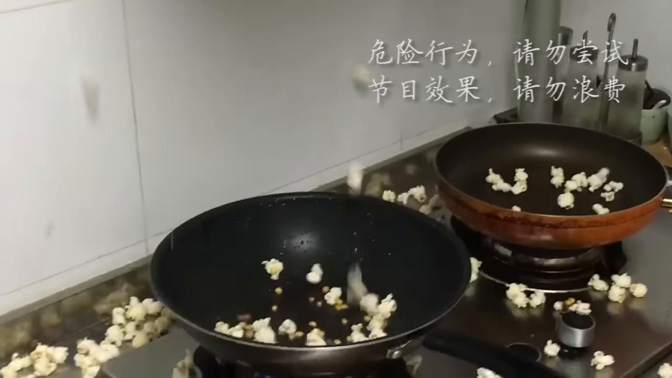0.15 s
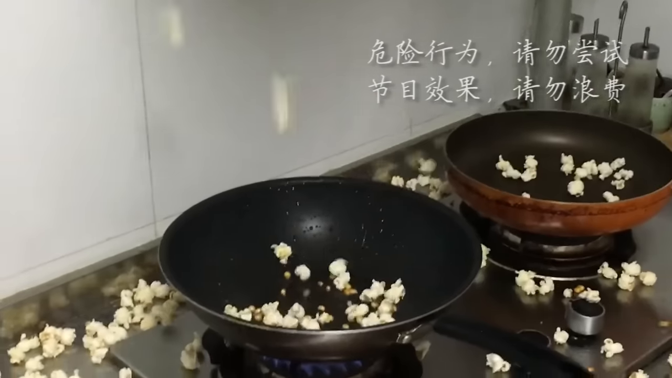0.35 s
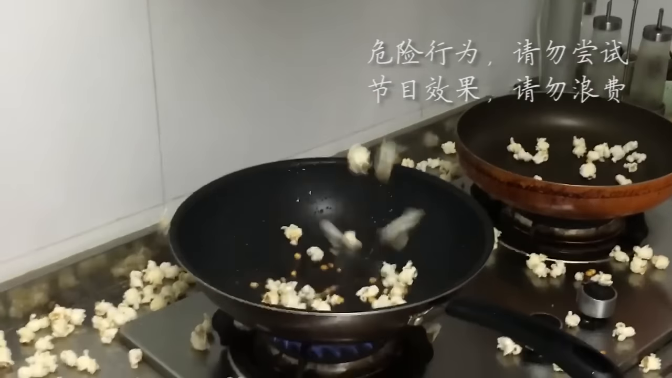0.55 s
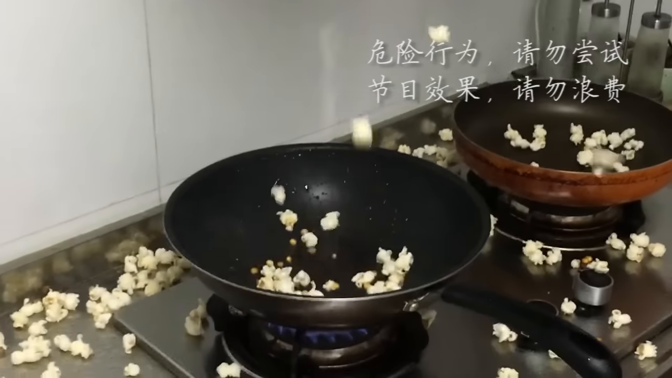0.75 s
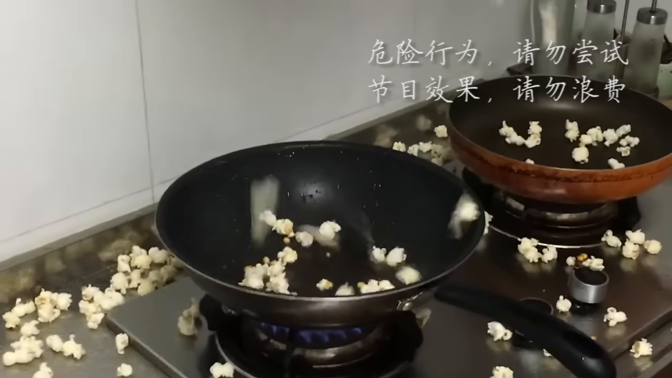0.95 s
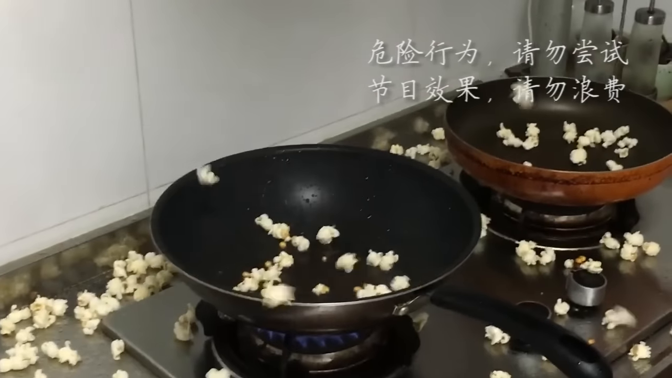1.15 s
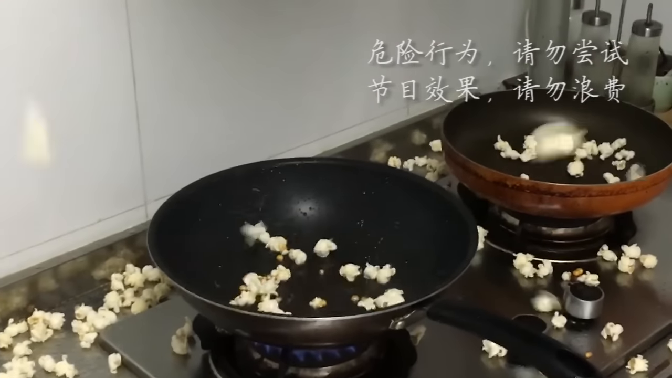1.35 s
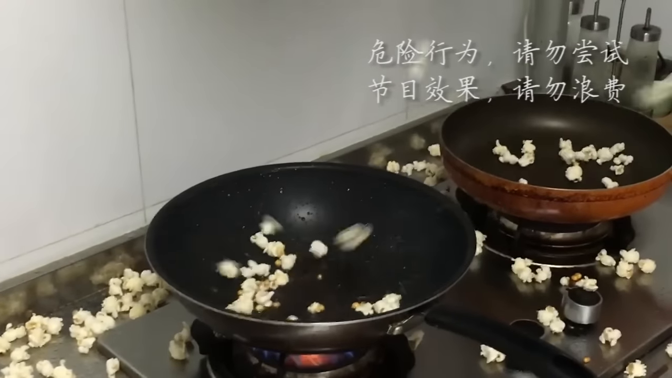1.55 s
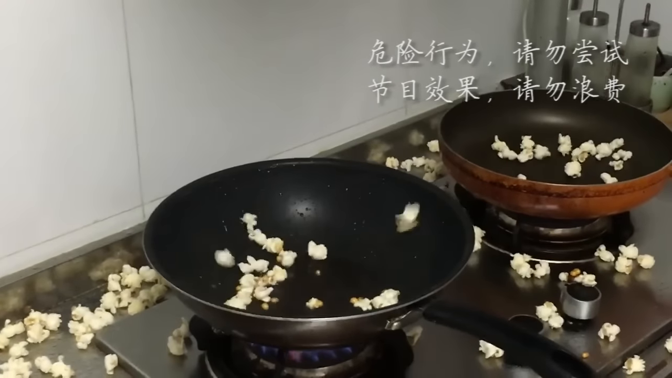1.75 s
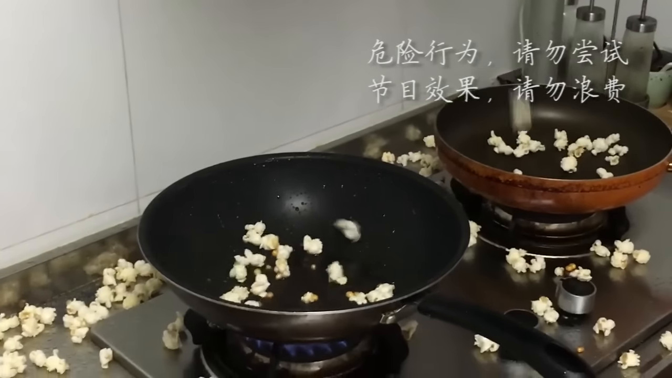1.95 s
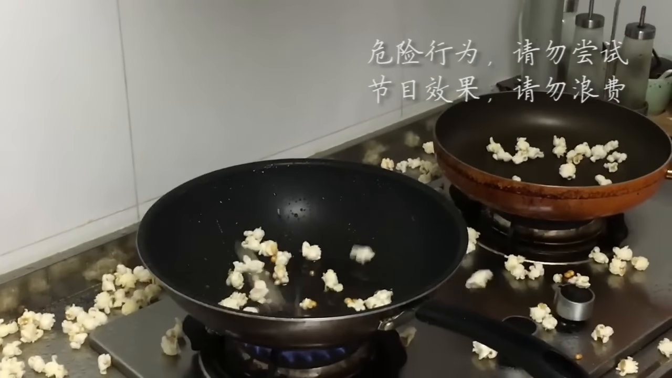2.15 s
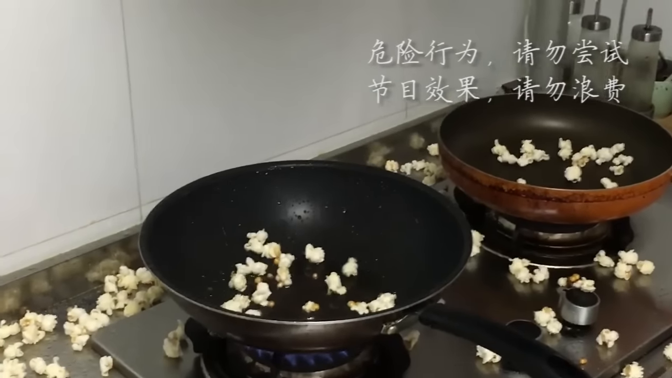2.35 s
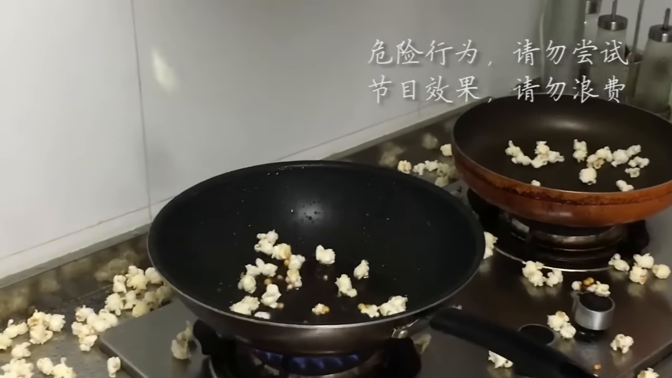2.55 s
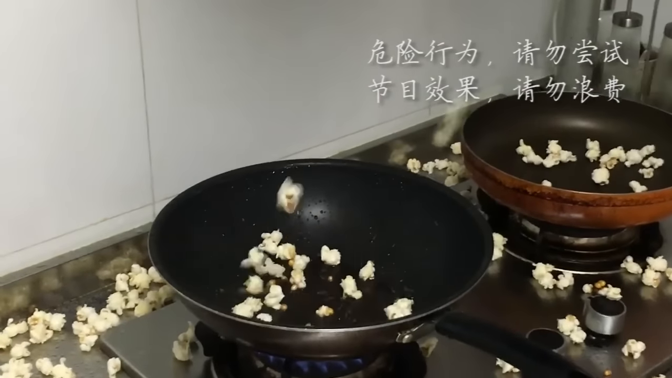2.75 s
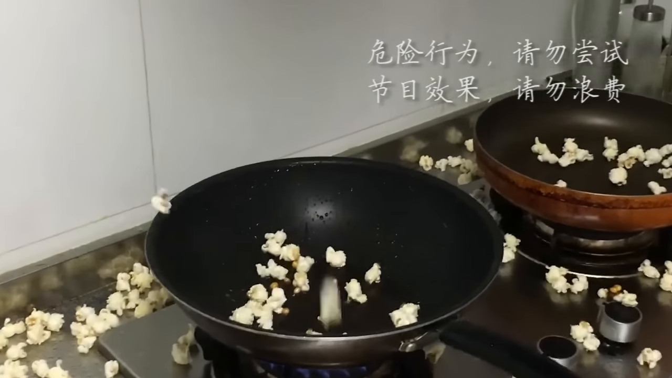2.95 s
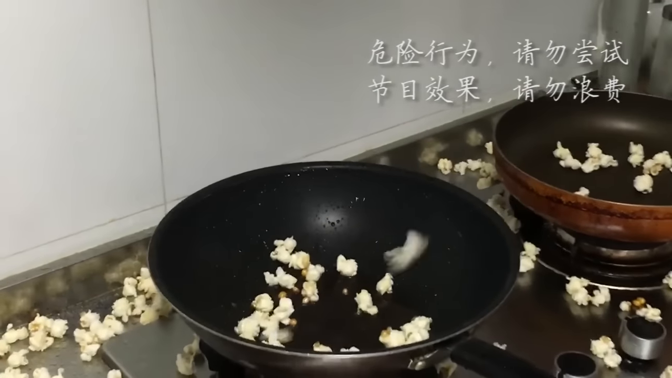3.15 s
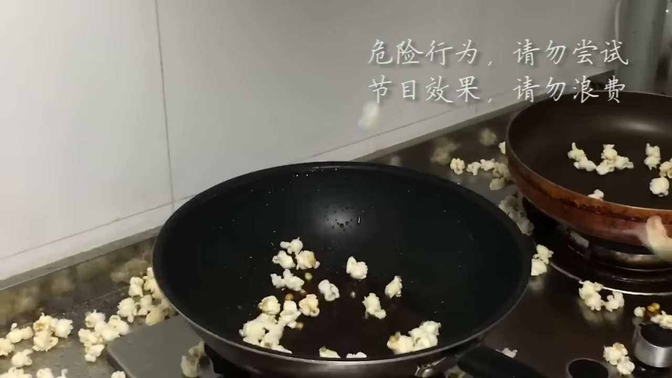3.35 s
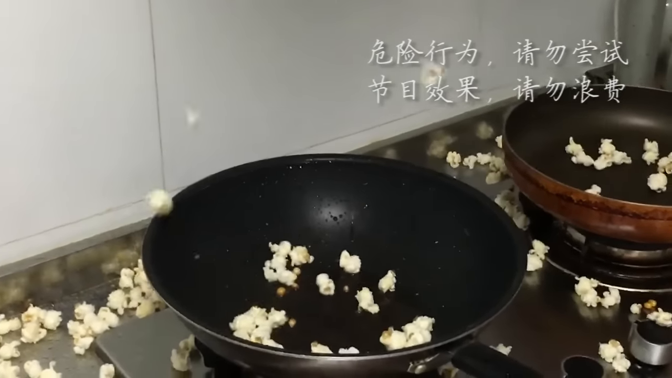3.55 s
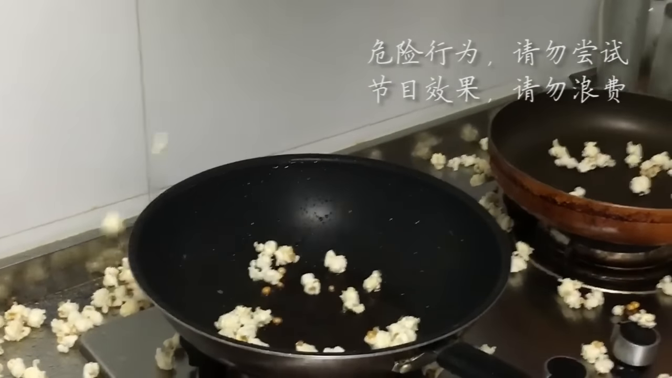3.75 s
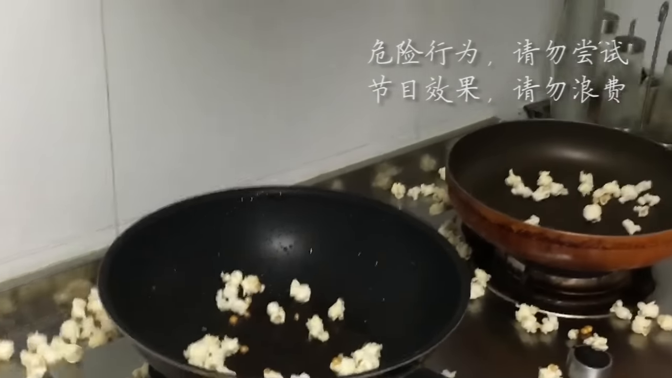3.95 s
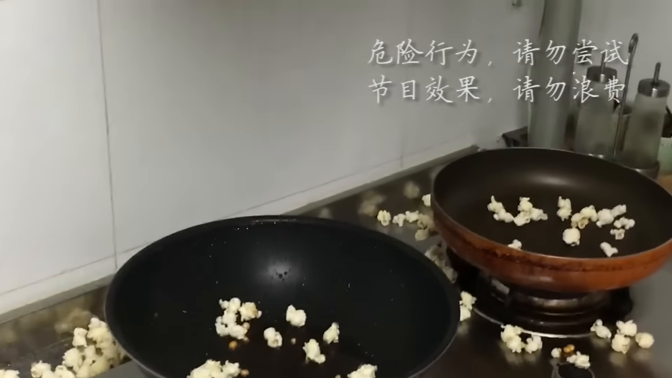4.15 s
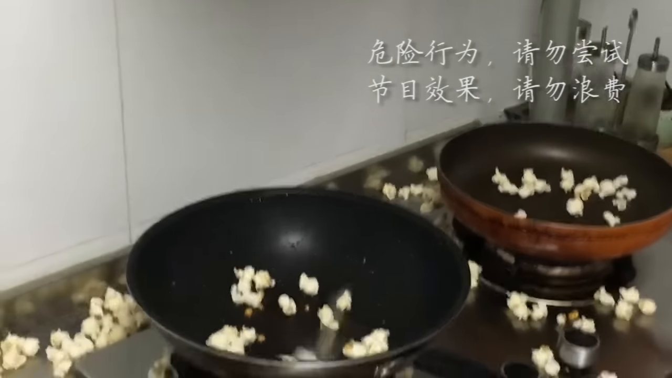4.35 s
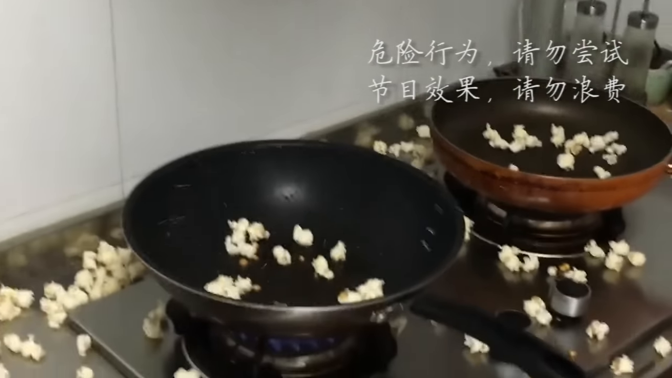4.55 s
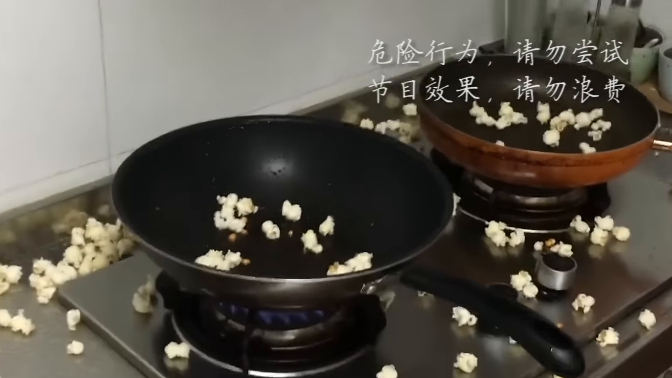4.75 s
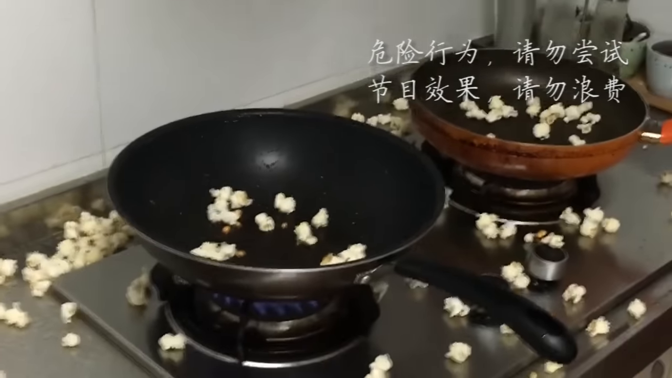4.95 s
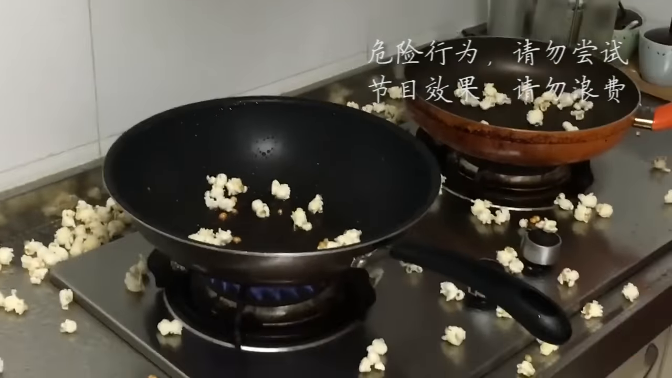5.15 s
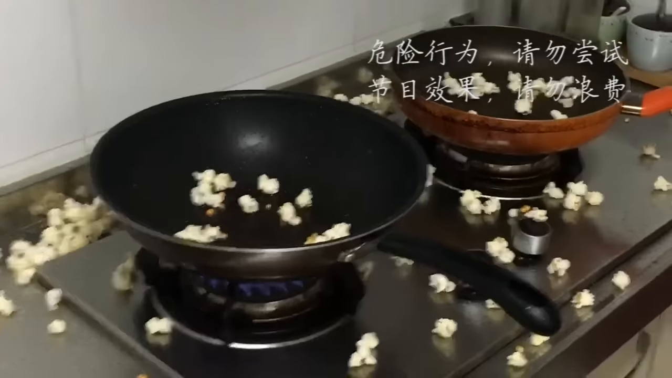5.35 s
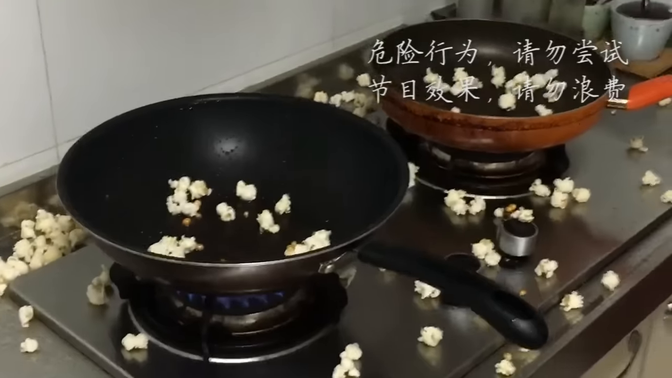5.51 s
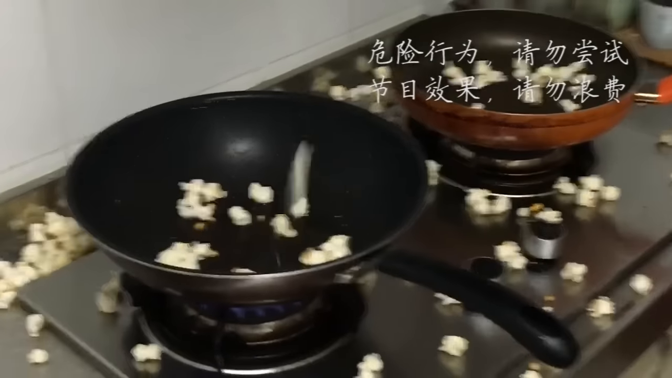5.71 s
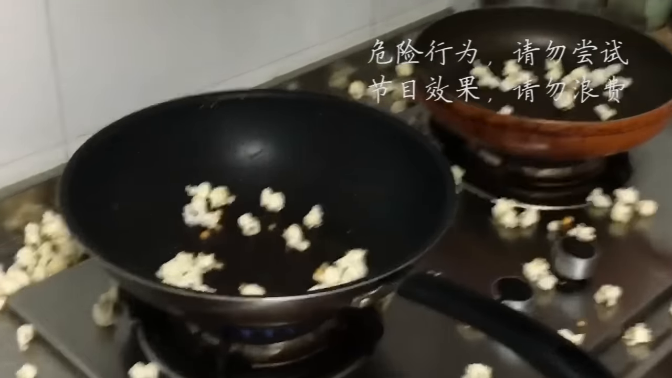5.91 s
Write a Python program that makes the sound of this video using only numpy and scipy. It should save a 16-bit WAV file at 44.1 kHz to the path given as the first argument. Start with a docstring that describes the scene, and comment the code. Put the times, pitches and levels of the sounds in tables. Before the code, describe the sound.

Loud popcorn bursts crackle in a ringing wok over sizzling oil and a hissing gas burner, thinning out to a few last pops.

```python
"""Popcorn bursts in an open wok on a gas stove in a small tiled kitchen, close to an overloading phone.
Loud pops crowd the first second: each hull cracks, kicks the wok into ringing and fills the room.
Flying corn lands with soft taps throughout; later the pops thin out and, from four seconds, oil spits.
The last pop is faint. All along, oil bubbles sizzle more and then less, and the burner hisses with
a thin whistle; both are shaped noise. The phone flattens every loud peak."""
import sys
import numpy as np
from scipy import signal
from scipy.fft import rfft, irfft
from scipy.io import wavfile

SR = 44100
rng = np.random.default_rng(int(sys.argv[2]) if len(sys.argv) > 2 else 0)


def output_pcm(signal):
    """Save a mono or channel-first signal as 16-bit PCM at the path in sys.argv[1].

    Samples are clipped to [-1, 1] before scaling.
    """
    pcm = np.clip(np.atleast_2d(signal).T, -1, 1) * 32767
    wavfile.write(sys.argv[1], SR, np.round(pcm).astype(np.int16))


N = 268116

# Bursting kernels. Each row: start in seconds, level in dB before the crack trim, crack centre in Hz,
# hull ring in Hz, delay of the echo off the wok wall in ms, signed echo share (ratio),
# kick on the wok in dB before the knock and ring trims.
KERNEL_POPS = [(0.001, 5.5, 2170, 7300, 0.22, 0.35, -12), (0.031, 1.5, 2360, 7360.0, 0.19, 0.1, -24),
               (0.313, -25.0, 910, 2160.0, 0.42, -0.44, -47),
               (0.484, -15, 1720.0, 2280.0, 0.41, -0.23, -29.5),
               (0.567, -1.0, 4420, 1300.0, 0.546, 0.2, -24), (0.6155, -3.5, 2950.0, 1610, 0.43, -0.2, -22),
               (0.649, -4.5, 1540.0, 8200, 0.31, 0.55, -18.5), (0.731, -5.5, 1090, 7900, 0.97, 0.5, -24.5),
               (0.8937, -8.5, 1120.0, 7900, 0.65, -0.34, -21.5),
               (0.9612, -9.5, 1730, 1440.0, 1.16, 0.24, -20), (0.9862, -2.5, 1730, 6150, 1.14, 0.4, -16.0),
               (1.006, -8.5, 1200.0, 1460, 0.5, 0.3, -16.5), (1.0892, -2.5, 2090, 1600, 1.14, 0.2, -18.5),
               (1.4163, 1, 3470, 2700, 0.99, 0.5, -18.0), (1.6583, -0.5, 2080, 6400, 0.22, 0.35, -17.5),
               (1.6868, -1.5, 2380.0, 6320.0, 0.31, -0.4, -26.5),
               (1.9521, -7.5, 1300, 7140, 0.57, -0.16, -18.5), (2.3453, -9, 1260, 8160, 1.002, 0.4, -25),
               (2.8093, 1.5, 2060, 6900, 0.22, 0.19, -21.5), (2.867, -10.5, 910, 5670, 1.06, -0.7, -22.5),
               (3.0548, -6, 2630, 7800, 0.81, 0.05, -26.5), (3.3104, -11.0, 2130.0, 8200, 0.89, 0.35, -29),
               (3.4746, 3, 3240, 7350, 1.26, 0.15, -23.5), (3.6133, -7.5, 5640.0, 8200, 0.65, 0.54, -29.5),
               (4.559, -2, 3660, 2370, 0.74, 0.54, -21), (5.8637, -11, 2460, 3100, 0.777, -0.27, -30.5),
               (6.067, -28, 7000.0, 6030, 0.39, 0.1, -56)]
# Corn landing on stove, pan and counter. Each row: start in seconds, level in dB, pitch in Hz,
# contact time in seconds.
CORN_LANDINGS = [(.228, -14.5, 1670, 0.004), (.346, -15, 1460, 0.0066), (0.449, -13, 1460, 0.0065),
                 (.469, -23, 1800, 0.0013), (1.252, -15, 1164, 0.0038), (1.829, -20, 1380, .006),
                 (2.13, -20, 1200, 0.0042), (2.225, -24, 2190, 0.011), (2.44, -20.5, 1390, 0.0032),
                 (2.564, -20.5, 1140, .0008), (2.63, -15, 1210, 0.029), (3.427, -19, 1070, .0017),
                 (3.903, -13, 960, 0.005), (4.022, -17, 496, 0.0048), (4.045, -23, 1270, .002),
                 (4.314, -32, 2070, .0002), (4.3722, -28.5, 1950, .0008), (5.173, -25.5, 1020, .0018),
                 (5.421, -24, 2240, 0.0058), (5.48, -24, 2330, 0.003)]
# Low thuds: dull knocks of the stovetop, and at 3.06 s a deep puff of air at the microphone. Each row: start in
# seconds, level in dB, pitch in Hz, 60 dB decay in seconds.
LOW_THUDS = [(2.347, -25, 95, 0.15), (2.868, -21, 113.5, 0.14), (3.059, -10.5, 74, 0.06),
             (3.907, -28.5, 103, 0.19), (5.868, -15.5, 123, 0.061)]
# Modes of the wok on its stand. Each row: pitch in Hz, mean level in dB, 60 dB decay in seconds.
WOK_MODES = [(114, -3, 0.25), (198.5, -11.5, 0.63), (274.3, 0, 0.28), (326, -7.5, 0.25), (541, -1, 0.17),
             (605.4, 6.5, 0.28), (825, -5.5, 0.14), (1118, -1, 0.29), (1610, -18.5, 0.79),
             (2250, 0.5, 0.12)]
# Spectrum of a cracking hull. Each row: frequency in Hz, relative level in dB.
CRACK_SPECTRUM = [(40, -37), (200, 5.5), (500, -29), (900, -4), (2000, 0), (6800, 2), (7600, -1.5),
                  (9500, 4), (10400, -1.5), (11500, 4.5), (15500, 0)]
# Spectrum of the knock on the wok. Each row: frequency in Hz, relative level in dB.
KNOCK_SPECTRUM = [(25, -19), (65, -4), (120, 3.5), (300, 4), (450, -3.5), (620, 8), (900, -4), (2000, -4),
                  (8000, -49)]
# Spectrum of the gas flame. Each row: frequency in Hz, relative level in dB.
FLAME_SPECTRUM = [(15, -34), (25, -20), (55, 1), (215, -8.5), (322, -6), (469, -13.5), (782, -14.5),
                  (997, -5.5), (1080, -8.5), (2420, -10), (2850, -16), (5010, -18), (6210, -8.5),
                  (6920, -18.5), (15500, -20.5)]
# Ring of the kitchen. Each row: band centre in Hz, 60 dB decay in seconds.
KITCHEN_DECAY = [(60, 0.56), (160, 0.28), (420, 0.66), (1100, 0.49), (2900, 0.42), (7000, .45),
                 (14000, 0.3)]
# The oil calms as the kernels run out. Each row: time in seconds, sizzle level in dB.
SIZZLE_LEVEL = [(0, -46), (2.6, -44), (4.0, -48), (5.2, -58), (6.08, -58)]
# Drops of oil that spit. Each row: start in seconds, level in dB before the spit trim.
OIL_SPITS = [(4.0467, -29), (4.2338, -26), (4.3725, -20.5), (4.8574, -29), (5.1672, -24), (5.1744, -25)]
# Air pushed at the microphone by the nearest pops. Each row: start in seconds, level in dB.
AIR_PUFFS = [(3.0554, 11), (3.3118, 8)]

RING = 32768  # samples in one struck sound
AGE = np.arange(RING) / SR  # seconds since its onset
FREQ = np.maximum(np.arange(RING // 2 + 1) * SR / RING, 1)  # Hz of its bins

# A strong burst is one full, tuned crack; a weak one is broad and mostly direct snap.
# Sharpness of a faint pop, what a 0 dB pop adds, and dB of that per dB of level.
WEAK_Q, STRONG_Q, Q_GROWTH = 0.044, 0.54, 0.77
# Direct snap over the room for a 0 dB pop, its slope with level, and its limit.
SNAP_DB, SNAP_PER_DB, SNAP_MAX_DB = 4.5, -0.44, 10.5
# The steel top's own pitch, and the sharpness it adds to landings near that pitch.
STOVE_HZ, STOVE_Q = 980, 2.24


def undb(db):
    """Decibels to gain."""
    return 10 ** (np.asarray(db) / 20)


def unit(x):
    """Scale to rms 1."""
    return x / np.sqrt(np.mean(x ** 2))


def along(points, f):
    """Join (Hz, value) points on a log-frequency axis."""
    hz, value = np.transpose(points)
    return np.interp(np.log(f), np.log(hz), value)


def resonance(f, hz, q):
    """Gain of a single resonance, 1 at its centre."""
    return 1 / np.sqrt(1 + (q * (f / hz - hz / f)) ** 2)


def colour(x, gain):
    """Causal minimum-phase filter with the given gain per bin, so that attacks stay sharp."""
    cepstrum = irfft(np.log(np.maximum(gain, 1e-5)))
    # folding the cepstrum onto positive time gives the minimum phase
    cepstrum[1:RING // 2] *= 2
    cepstrum[RING // 2 + 1:] = 0
    return irfft(rfft(x) * np.exp(rfft(cepstrum)))


def fade(t60):
    """Decay by 60 dB in t60 seconds."""
    return np.exp(-np.log(1000) * AGE / t60)


def swing(hz, t60):
    """One damped sine of pressure."""
    return np.sin(2 * np.pi * hz * AGE) * fade(t60)


def add(track, s, sound):
    """Mix a sound in at time s."""
    start = int(np.clip(s * SR, 0, N - 1))
    track[start:start + len(sound)] += sound[:N - start]


# Overlapping bands of the kitchen's ring, and the decay of each.
BAND_HZ = [hz for hz, _ in KITCHEN_DECAY]
BANDS = [np.interp(np.log(FREQ), np.log(BAND_HZ), row) for row in np.eye(len(KITCHEN_DECAY))]
FADES = [fade(t60) for _, t60 in KITCHEN_DECAY]


def kitchen(uneven_db=1.0, clump_s=0.0014, blend_s=0.3):
    """Fresh echoes off the tiles: early ones clump, later ones blend, each band dies at its own rate."""
    knots = np.arange(600)
    unevenness = np.interp(AGE / clump_s, knots, rng.standard_normal(len(knots)))
    clumps = undb(uneven_db * np.exp(-AGE / blend_s) * unevenness)
    echoes = rfft(rng.standard_normal(RING) * clumps)
    return sum(irfft(echoes * band) * decay for band, decay in zip(BANDS, FADES))


def burst(snap_db, snap_s=0.0022, wall_db=-7, build_s=0.0015):
    """A short noise crack, its slap off the wall behind the stove, then the room building up."""
    crack = rng.standard_normal(RING) * np.exp(-AGE / snap_s) * undb(snap_db)
    wall_delay_s = rng.uniform(0.00396, 0.0108)
    slap = np.roll(crack, int(wall_delay_s * SR)) * undb(wall_db)
    return crack + slap + kitchen() * (1 - np.exp(-AGE / build_s))


def burner(flame_db=-44.5, flutter_db=1, whistle_db=-54, whistle_hz=6250, whistle_q=22):
    """The gas flame rushes and flutters as shaped noise; the jet adds a narrow, airy whistle."""
    f = np.maximum(np.arange(N // 2 + 1) * SR / N, 1)

    def shaped_noise(gain):
        """White noise through a spectrum, at rms 1."""
        return unit(irfft(rfft(rng.standard_normal(N)) * gain, N))

    flame = shaped_noise(undb(along(FLAME_SPECTRUM, f)))
    flutter = shaped_noise(resonance(f, 5.4, 1) ** 2)  # slow wander around 5.4 Hz
    whistle = shaped_noise(resonance(f, whistle_hz, whistle_q) ** 2)
    return flame * undb(flame_db + flutter_db * flutter) + undb(whistle_db) * whistle


def sizzle(per_s=260, hz=6000, q=0.13):
    """Tiny bubbles burst at random in the oil, a few of them louder than the rest."""
    sizes = undb(5 * np.minimum(rng.exponential(size=N), 3.5))
    bursting = rng.random(N) < per_s / SR
    bubbles = bursting * rng.choice([-1, 1], N) * sizes
    bubble_tick = colour(burst(snap_db=-11.0, snap_s=0.00028), resonance(FREQ, hz, q))
    bubbling = unit(signal.fftconvolve(bubbles, bubble_tick)[:N])
    level_db = np.interp(np.arange(N) / SR, *np.transpose(SIZZLE_LEVEL))
    return undb(level_db) * bubbling


def spits(spit_db=-17, hz=12500, q=0.98):
    """Now and then a drop of oil spits: a noise burst tuned to a thin, bright tick."""
    out = np.zeros(N)
    for s, db in OIL_SPITS:
        tick = colour(burst(snap_db=13, snap_s=0.0012), resonance(FREQ, hz, q))
        add(out, s, undb(db + spit_db) * tick)
    return out


def thuds(puff_hz=520, puff_t60_s=0.0016):
    """Puffs of air from the nearest pops and low thuds, mostly of the stovetop, all damped sines."""
    out = np.zeros(N)
    for s, db in AIR_PUFFS:
        add(out, s, undb(db) * swing(puff_hz, puff_t60_s))
    for s, db, hz, t60 in LOW_THUDS:
        add(out, s, undb(db) * swing(hz, t60))
    return out


def tap(hz, q, contact_s, snap_db, crumble_db=2, crumb_s=0.00263):
    """Light, spongy corn lands lobe by lobe: the longer the contact, the softer and duller the blow."""
    swell = 1 - np.exp(-AGE / max(contact_s, 1 / SR))
    unevenness = np.interp(AGE / crumb_s, np.arange(20), rng.standard_normal(20), right=0)
    blow = burst(snap_db) * swell * undb(crumble_db * unevenness)
    dulling = np.hypot(1, FREQ * contact_s / 20)
    return colour(blow, resonance(FREQ, hz, q) / dulling)


def landings(landing_q=0.89, tumble_db=-41, tumble_hz=1500, flight_s=0.41):
    """Clear landings, sharper near the stove's pitch, and a faint tumble ending each kernel's flight."""
    out = np.zeros(N)
    for s, db, hz, contact_s in CORN_LANDINGS:
        q = landing_q + STOVE_Q * resonance(hz, STOVE_HZ, 4) ** 2
        add(out, s, undb(db) * tap(hz, q, contact_s, snap_db=11.5))
    # flight time, level and pitch scatter around the typical settings
    for s, *_ in KERNEL_POPS:
        late, size, pitch = rng.standard_normal(3)
        landing_s = s + flight_s * np.exp(0.16 * late)
        tumble = tap(tumble_hz * np.exp(0.25 * pitch), q=0.62, contact_s=0.0056, snap_db=3)
        add(out, landing_s, undb(tumble_db + 2 * size) * tumble)
    return out


def wok_ring(scatter_db=1.5, waver=0.87, waver_s=0.0181):
    """The wok's modes, driven differently by each pop; their own echoes make them waver."""
    out, knots = 0, np.arange(40)
    for hz, db, t60 in WOK_MODES:
        real, imag = rng.standard_normal((2, len(knots)))
        echoes = np.interp(AGE / waver_s, knots, real + 1j * imag)
        mode = (1 + waver * echoes) * np.exp(2j * np.pi * hz * AGE) * rng.choice([-1, 1])
        drive = undb(db + scatter_db * rng.standard_normal())
        out = out + drive * mode.imag * fade(t60)
    return out


def tearing(echo_ms, share, splinter=0.3, tear_s=0.0046, echo_top_hz=9000):
    """Spectral ripples: irregular from the splintering hull, even from the echo in the bowl."""
    splinters = rfft(rng.standard_normal(RING) * np.exp(-AGE / tear_s))
    splinters = splinters / np.linalg.norm(splinters)
    echo = share * np.exp(-2j * np.pi * FREQ * echo_ms / 1000)
    # the curved wall scatters the highest part of the echo
    echo = echo / np.hypot(1, (FREQ / echo_top_hz) ** 2)
    # splinters are scaled by their norm over all bins, so this ripple is slight
    return unit(np.abs(1 + splinter * splinters + echo))


def pops(crack_db=-1, ring_db=-5, knock_db=8, hull_q=2.25, hull_boost_db=5):
    """Steam tears the hull open; the recoil knocks on the wok and sets it ringing."""
    out = np.zeros(N)
    for s, db, hz, hull_hz, echo_ms, share, kick_db in KERNEL_POPS:
        q = WEAK_Q + STRONG_Q * undb(Q_GROWTH * db)
        snap_db = min(SNAP_DB + SNAP_PER_DB * db, SNAP_MAX_DB)
        crack = undb(db + crack_db + along(CRACK_SPECTRUM, FREQ)) * resonance(FREQ, hz, q)
        hull_ring = undb(hull_boost_db * resonance(FREQ, hull_hz, hull_q) ** 2)
        torn_hull = crack * hull_ring * tearing(echo_ms, share)
        knock = undb(kick_db + knock_db + along(KNOCK_SPECTRUM, FREQ))
        pop = colour(burst(snap_db), np.hypot(torn_hull, knock))
        add(out, s, pop + undb(kick_db + ring_db) * wok_ring())
    return out


def scene():
    """Everything reaches one microphone, so both channels are alike."""
    mono = burner() + sizzle() + spits() + thuds() + landings() + pops()
    return np.array([mono, mono])


def record(dry, rumble_hz=42, top_hz=15850):
    """The phone flattens the peaks of the loud pops, drops the deepest rumble and cuts the top."""
    clipped = dry / (1 + dry ** 6) ** (1 / 6)
    lean = signal.sosfilt(signal.butter(2, rumble_hz, "high", fs=SR, output="sos"), clipped)
    return signal.sosfilt(signal.ellip(10, 0.1, 70, top_hz, fs=SR, output="sos"), lean)


dry = scene()
out = record(dry)
output_pcm(out)
```